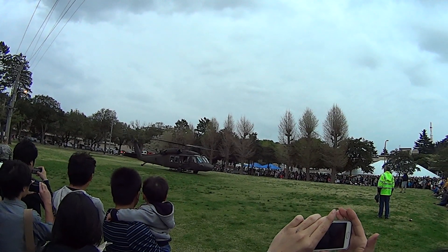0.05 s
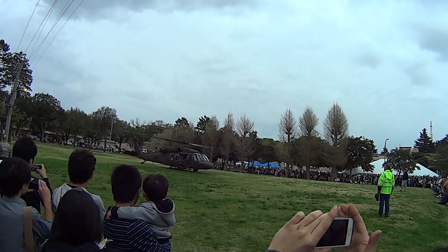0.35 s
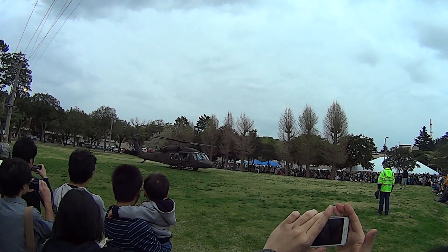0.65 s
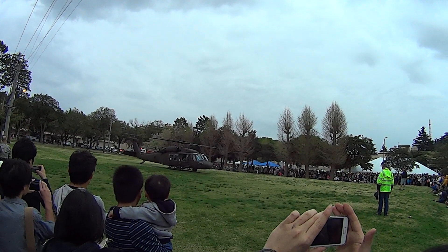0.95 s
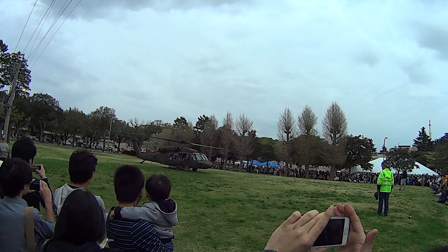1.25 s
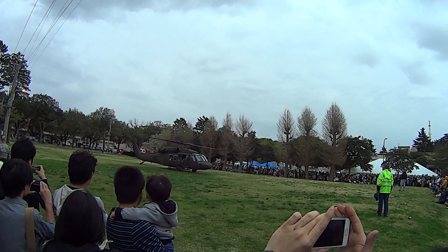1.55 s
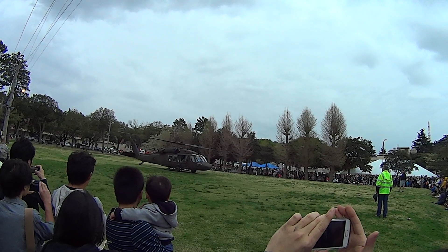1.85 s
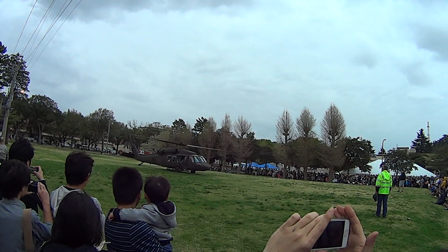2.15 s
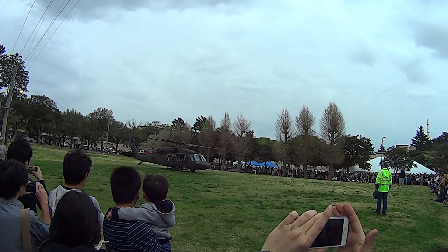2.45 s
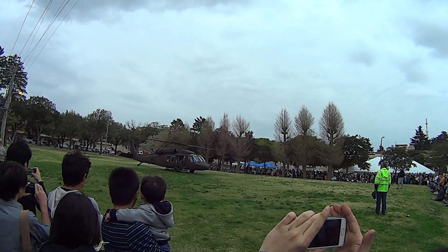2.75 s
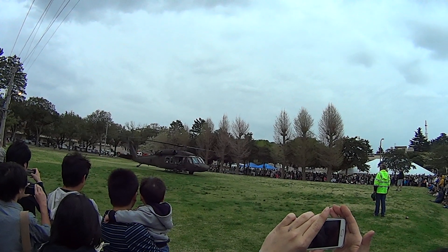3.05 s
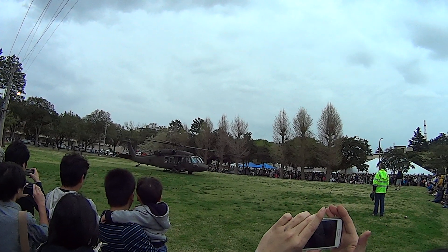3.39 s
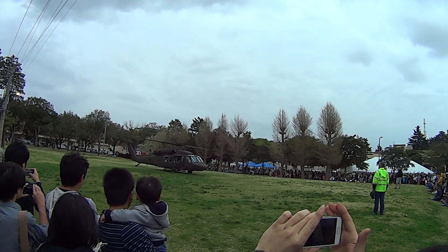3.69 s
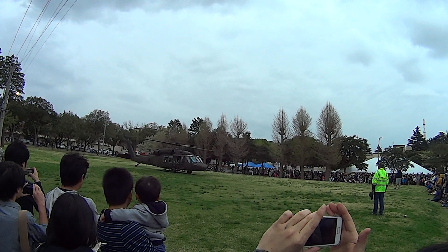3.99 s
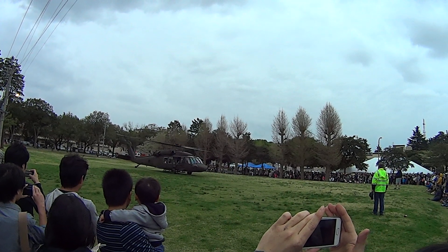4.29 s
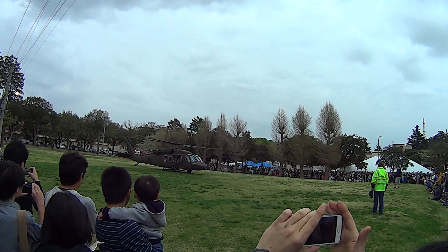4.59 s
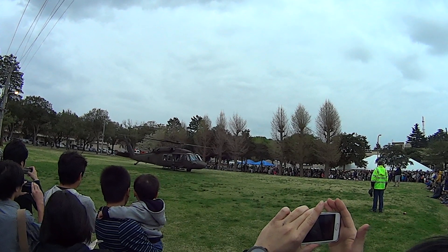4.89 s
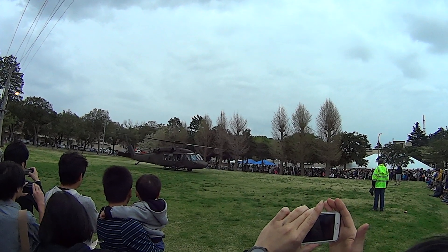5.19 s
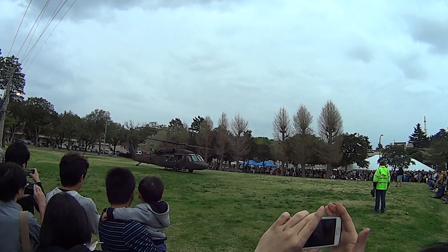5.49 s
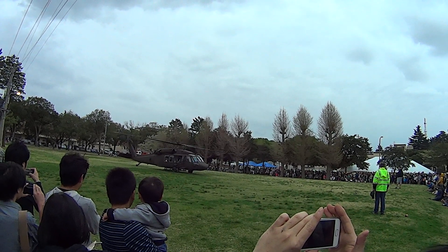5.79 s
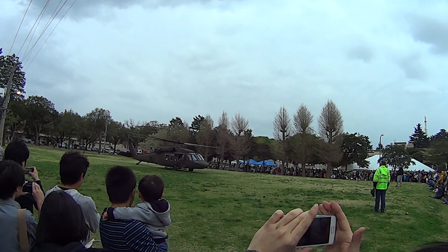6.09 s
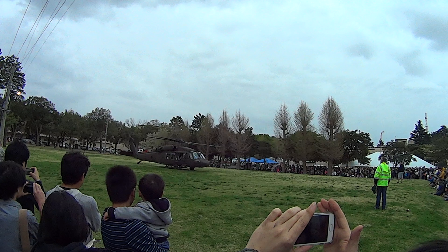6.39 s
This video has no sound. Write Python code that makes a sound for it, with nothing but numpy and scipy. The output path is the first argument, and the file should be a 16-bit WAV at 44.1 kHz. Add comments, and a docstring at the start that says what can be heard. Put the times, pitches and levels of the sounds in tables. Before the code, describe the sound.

A helicopter stands some way off on a grass field with its engines running. A loud, high-pitched turbine hiss dominates throughout, gently swelling and fluttering in the moving air. Thin whines lie half buried in it, above a softer exhaust roar. The rotor's rapid low throb, a tail rotor hum and a trace of wind rumble stay faint. A camera's stereo microphone keeps the overall level even.

```python
"""On a grass field, a helicopter stands some way off with its turbines running and rotors turning.
The engines hiss in two broad humps over an exhaust roar, with faint gear and compressor whines.
Four main blades throb, each pushing out a low pulse; the tail rotor hums and a faint wind rumbles.
Moving air makes the hiss swell and its top flutter; the camera's gain control then pushes
the lower sounds down."""
import sys
import numpy as np
from scipy.fft import rfft, irfft
from scipy.io import wavfile
from scipy.ndimage import uniform_filter1d, minimum_filter1d

SR = 44100
rng = np.random.default_rng(int(sys.argv[2]) if len(sys.argv) > 2 else 0)


def to_wav(s):
    """Save 16-bit WAV."""
    ch = np.atleast_2d(s).T  # columns
    pcm = np.round(np.clip(ch, -1, 1) * 32767)  # PCM
    wavfile.write(sys.argv[1], SR, pcm.astype(np.int16))


N = 284004
TIME = np.arange(N) / SR
FREQS = np.maximum(np.fft.rfftfreq(N, 1 / SR), 1)
BLADES, BLADE_HZ, FIRST_BLADE_S = 4, 17.265, 0.02091   # main rotor; BLADE_HZ counts blade passes


def from_db(db):
    """Decibels to gain."""
    return 10 ** (np.asarray(db) / 20)


def in_time(points):
    """Read an automation curve sample by sample."""
    time_s, value = np.transpose(points)
    return np.interp(TIME, time_s, value)


def at_hz(points, hz=FREQS):
    """Read a curve along a log-frequency axis."""
    freq_hz, value = np.transpose(points)
    return np.interp(np.log(hz), np.log(freq_hz), value)


def drift(rate_hz):
    """Smooth random modulation with spread 1, mostly slower than rate_hz."""
    slow = irfft(rfft(rng.standard_normal(N)) / (1 + (FREQS / rate_hz) ** 2), N)
    return (slow - slow.mean()) / slow.std()


# Phase between the two microphone ports: freq_hz, left_lead_rad
PORT_PHASE = [(40, -.2), (220, -.7), (370, -1.5), (480, -1.3), (540, -2.3), (1500, -1.9), (1700, -.9),
              (2150, -.7), (2400, -1.25), (4500, -.65), (6300, -.65), (6800, .45), (9000, .2), (10000, 0)]
# Pan across the spectrum: freq_hz, left_minus_right_db
PORT_BALANCE = [(80, -1), (700, -.5), (1050, -4), (1450, -2.5), (1750, -2), (2200, 0.5), (2600, -1.5),
                (3300, -2), (4100, -3.5), (5200, -3.5), (6000, -5), (6600, -5.5), (7400, -3.5), (8200, 0),
                (11000, 0)]
def ports(hz):
    """Complex gain of the left and right microphone port for sound from the helicopter."""
    left = from_db(at_hz(PORT_BALANCE, hz) / 2) * np.exp(.5j * at_hz(PORT_PHASE, hz))
    return np.array([left, 1 / left])


# How alike left and right are, from 0 (wide) to 1 (narrow): freq_hz, coherence
STEREO_COHERENCE = [(30, .4), (75, 0.77), (220, 0.61), (340, .35), (480, 0.72), (600, 0.68), (1900, 0.5),
                    (2500, 0.84), (3500, 0.76), (5100, 0.95), (5900, 0.68), (6450, .33), (7100, 0.78),
                    (9200, 0.65), (10200, 1)]
def air_noise(colour):
    """Stereo turbulence of a given colour, partly scattered on its way; the centre has rms 1."""
    alike = np.sqrt(np.clip(at_hz(STEREO_COHERENCE), 0, .99))
    direct, scattered = rfft(rng.standard_normal((2, N)))
    pair = np.sqrt(1 + alike) * direct + np.sqrt(1 - alike) * scattered * [[1], [-1]]
    noise = irfft(pair * colour * ports(FREQS), N)
    return noise / noise.mean(axis=0).std()


# Broad EQ of the turbine noise: freq_hz, relative_db
JET_EQ = [(200, -81), (450, -75), (900, -68.5), (1300, -62), (1700, -58), (2200, -52), (3400, -55),
          (4100, -55), (5200, -51.5), (6400, -60.5), (7200, -60), (8100, -65), (9500, -71.5), (11000, -78)]
# Bell boosts and cuts on that EQ: centre_hz, width_hz, gain_db
JET_BELLS = [(499, 35, -6), (666, 73, 5), (730, 63, -5.5), (1416, 57, 3.5), (1576, 30, -2), (2046, 310, 3),
             (2485, 260, 3), (4364, 54, 6), (4695, 215, 4), (5140, 290, 5), (5930, 170, 3.5),
             (7000, 440, 0.5), (8800, 100, 2)]
def jet_band(low_hz, high_hz):
    """One steep-sided band of the turbine noise, brought to rms 1 in the centre."""
    bells_db = sum(db * np.exp(-((FREQS - hz) / width) ** 2) for hz, width, db in JET_BELLS)
    band_power = 1 / (1 + (low_hz / FREQS) ** 24) / (1 + (FREQS / high_hz) ** 24)
    return air_noise(from_db(at_hz(JET_EQ) + bells_db) * np.sqrt(band_power))


# How strongly moving air carries the hiss across the field: time_s, gain_db (at share 1)
AIR_SWELL = [(0.0, -2), (0.85, -0.5), (1.03, 2), (1.45, 1), (1.62, -0.5), (2.76, -1.5), (2.92, 1.5),
             (3.2, -0.5), (3.6, 1), (3.75, -1.6), (3.9, 1.5), (4.24, 3), (4.62, -3.5), (4.8, 0.7),
             (5.06, -1), (5.24, 0), (5.88, 2), (6.44, -0.5)]
def carried(share, eddy_db, eddy_hz=3.2):
    """Gain of a layer in moving air: its share of the common swell, plus eddies of its own."""
    return from_db(share * in_time(AIR_SWELL) + eddy_db * drift(eddy_hz))


def chop(blade_db, turn_db, flutter_db, flutter_hz, lag_s):
    """Tremolo from each blade and each rotor turn, with flutter from the downwash; rms 1."""
    blade_phase = 2 * np.pi * BLADE_HZ * (TIME - FIRST_BLADE_S)
    blade = np.cos(blade_phase - 2 * np.pi * BLADE_HZ * lag_s)
    turn = np.cos(blade_phase / BLADES)
    gain = from_db(blade_db * blade + turn_db * turn + flutter_db * drift(flutter_hz))
    return gain / np.sqrt(np.mean(gain ** 2))


# Fader ride of the exhaust roar: time_s, level_db
ROAR_FADER = [(0.0, -38), (0.9, -36), (2.2, -35), (3.6, -35), (4.1, -37.5), (4.45, -35), (5.1, -35.5),
              (5.8, -35.5), (6.44, -35)]
# Fader ride of the sizzle on top of the hiss: time_s, level_db
SIZZLE_FADER = [(0.0, -27.5), (0.55, -28.5), (1.0, -26.5), (2.9, -28.5), (3.68, -26.5), (4.0, -29),
                (5.55, -26.5), (5.75, -26.5), (6.44, -26.5)]
# Brief flares of the sizzle, and one dip: centre_s, gain_db
SIZZLE_FLARES = [(1.535, 1.5), (1.74, 5), (1.995, 3), (2.683, 3), (4.985, 2.5), (5.06, 1.5), (5.228, 1),
                 (5.55, 7), (5.93, -1), (6.16, 3)]
def turbines(lower_db=-23.5, between_db=-29.5, upper_db=-20.5, flare_s=0.02, seesaw_db=0.5):
    """Exhaust roar, two humps of hiss and a fluttering sizzle on top; the high bands swell most."""
    seesaw = from_db(seesaw_db * drift(rate_hz=6.8))   # the hiss swirls: one hump up, the other down
    roar = jet_band(247, 1690) * carried(share=0.0, eddy_db=1.17)
    roar *= chop(blade_db=1.5, turn_db=0.5, flutter_db=0.84, flutter_hz=25.4, lag_s=0.002)
    lower_hiss = jet_band(1740, 3130) * carried(share=0.34, eddy_db=1.08)
    lower_hiss *= chop(blade_db=0.2, turn_db=0.77, flutter_db=0.68, flutter_hz=22, lag_s=-0.00073)
    between = jet_band(2990, 4170) * carried(share=0.55, eddy_db=1.05)
    upper_hiss = jet_band(3870, 5910) * carried(share=1.42, eddy_db=-0.03)
    upper_hiss *= chop(blade_db=-0.3, turn_db=0.1, flutter_db=0.35, flutter_hz=18, lag_s=-0.012)
    sizzle = jet_band(6290, 17500) * carried(share=0.9, eddy_db=0.12)
    sizzle *= chop(blade_db=0.8, turn_db=-0.3, flutter_db=1.53, flutter_hz=45.3, lag_s=-0.0023)
    flare_db = sum(db * np.exp(-((TIME - s) / flare_s) ** 2) for s, db in SIZZLE_FLARES)
    return (from_db(in_time(ROAR_FADER)) * roar
            + from_db(lower_db) * lower_hiss / seesaw
            + from_db(between_db) * between
            + from_db(upper_db) * upper_hiss * seesaw
            + from_db(in_time(SIZZLE_FADER) + flare_db) * sizzle)


def shaft_tone(hz, wander_hz, waver_db):
    """The tone of a spinning shaft, its pitch and level wavering in the moving air; rms about 1."""
    phase = 2 * np.pi * np.cumsum(hz + wander_hz * drift(rate_hz=6.2)) / SR
    stereo_sine = np.real(ports(hz)[:, None] * np.exp(1j * phase))
    return np.sqrt(2) * from_db(waver_db * drift(rate_hz=0.75)) * stereo_sine


# Gear and compressor tones: pitch_hz, level_db
WHINE_TONES = [(1055, -52), (2406, -37.5), (2476, -36), (3163, -42.5)]
def whines():
    """Thin tones of the gears and compressors, half buried in the hiss."""
    swell = carried(share=0.68, eddy_db=2.5)
    tones = sum(from_db(db) * shaft_tone(hz, wander_hz=3.89, waver_db=0.5) for hz, db in WHINE_TONES)
    return swell * tones


# EQ of the air a blade pushes aside: freq_hz, relative_db
THUMP_EQ = [(15, -24), (35, -13), (60, -8), (110, -5), (165, 0), (215, -3), (300, -7), (420, -13.5),
            (600, -32)]
# Fader ride of the main rotor's thumping: time_s, gain_db
THUMP_FADER = [(0.0, 3.5), (0.6, -5), (0.8, -0.5), (1.2, 2.5), (1.6, -1), (2.6, 5), (2.85, 0), (4.3, -0.5),
               (4.6, -4.5), (4.9, 1.5), (6.44, -0.5)]
def main_rotor(slap_db=-53.0, wash_db=-51.5, uneven_db=2.5, jitter_s=0.00014, smear_s=0.016):
    """Each blade sends one low pressure pulse through a fluttering wash of turbulence."""
    pass_s = np.arange(FIRST_BLADE_S, N / SR, 1 / BLADE_HZ)
    late, strength = rng.standard_normal((len(pass_s), 2)).T
    pass_samples = ((pass_s + jitter_s * late) * SR).astype(int)
    pulses = np.zeros(N)
    pulses[np.clip(pass_samples, 0, N - 1)] = from_db(uneven_db * strength)
    # the trees round the field smear each pulse into a short tail
    smear = rng.standard_normal(N) * np.exp(-TIME / smear_s)
    smear_allpass = np.exp(1j * np.angle(rfft(smear)))
    colour = from_db(at_hz(THUMP_EQ))
    slaps = irfft(rfft(pulses) * smear_allpass * colour * ports(FREQS), N)
    wash = air_noise(colour) * chop(blade_db=0.0, turn_db=0.5, flutter_db=1.0, flutter_hz=30, lag_s=.004)
    thumping = from_db(slap_db) * slaps / slaps.std() + from_db(wash_db) * wash
    return from_db(in_time(THUMP_FADER)) * thumping


# Fader ride of the tail rotor's fundamental: time_s, gain_db
HUM_FADER = [(0.0, -4.5), (1.3, -1.5), (2.4, 3.5), (3.7, 1), (4.6, 0), (5.5, 1.5), (6.44, 4)]
def tail_rotor(pitch_hz=80.0, hum_db=-54.3, octave_db=-60.0):
    """The blade note of the tail rotor and its octave, throbbing with the main rotor."""
    hum = from_db(hum_db + in_time(HUM_FADER)) * shaft_tone(pitch_hz, wander_hz=1.0, waver_db=-1.3)
    octave = from_db(octave_db) * shaft_tone(2 * pitch_hz, wander_hz=1.68, waver_db=3.0)
    return (hum + octave) * chop(blade_db=1.0, turn_db=0.5, flutter_db=2.2, flutter_hz=12, lag_s=0.0)


def breeze(level_db=-66.0, corner_hz=45.0, gust_db=6.0):
    """A faint, gusty rumble of wind, separate at each microphone port."""
    rumble = irfft(rfft(rng.standard_normal((2, N))) / (1 + (FREQS / corner_hz) ** 2), N)
    return from_db(level_db + gust_db * drift(rate_hz=2)) * rumble / rumble.std()


def scene():
    """The helicopter and the air round the listener."""
    return turbines() + whines() + main_rotor() + tail_rotor() + breeze()


def gain_control(x, target_db=-15.5, window_s=0.05, strength=0.87):
    """The gain rides the mix towards a target level, so the bass sinks whenever the hiss swells."""
    power = uniform_filter1d(np.mean(x ** 2, axis=0), int(window_s * SR))
    level_db = 10 * np.log10(power + 1e-12)
    return x * from_db(strength * (target_db - level_db))


def limiter(x, ceiling_db=-5.0, release_db_per_s=150.0, smooth_samples=45):
    """The gain ducks at each peak over the ceiling and slides back."""
    peak_db = 20 * np.log10(np.abs(x).max(axis=0) + 1e-9)
    over_db = np.maximum(peak_db - ceiling_db, 0)
    release_db = release_db_per_s * TIME
    duck_db = np.maximum.accumulate(over_db + release_db) - release_db
    held_gain_db = minimum_filter1d(-duck_db, smooth_samples)
    return x * from_db(uniform_filter1d(held_gain_db, smooth_samples))


def record(dry, cutoff_hz=11070):
    """The camera evens out the level, holds down the peaks and cuts the top steeply."""
    levelled = limiter(gain_control(dry))
    return irfft(rfft(levelled) / np.sqrt(1 + (FREQS / cutoff_hz) ** 700), N)


dry = scene()
out = record(dry)
to_wav(out)
```